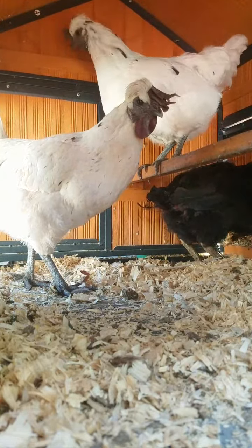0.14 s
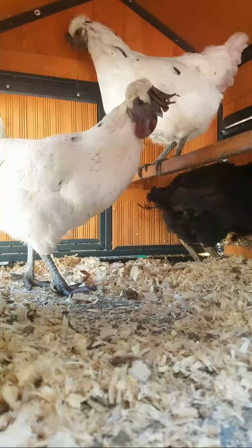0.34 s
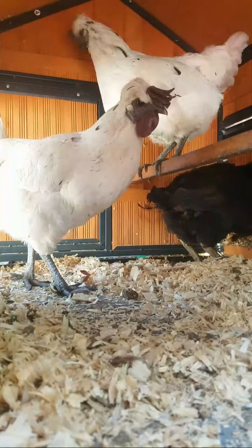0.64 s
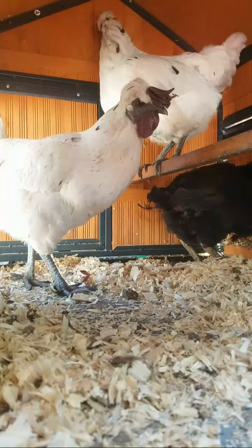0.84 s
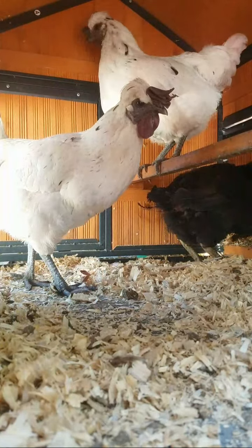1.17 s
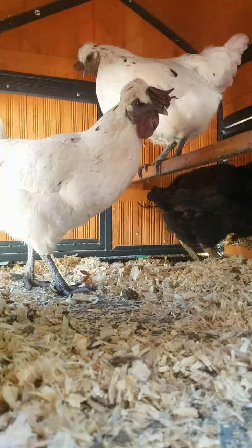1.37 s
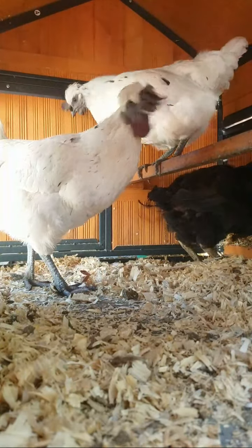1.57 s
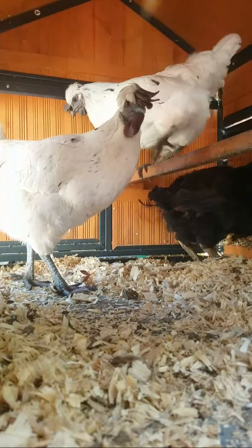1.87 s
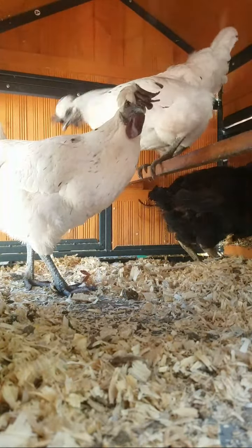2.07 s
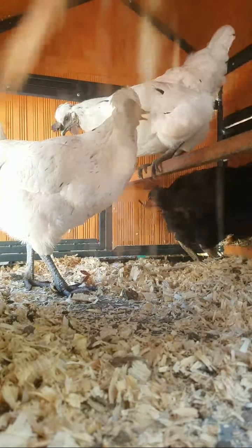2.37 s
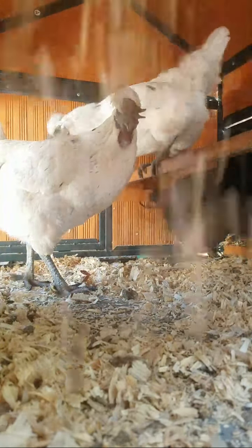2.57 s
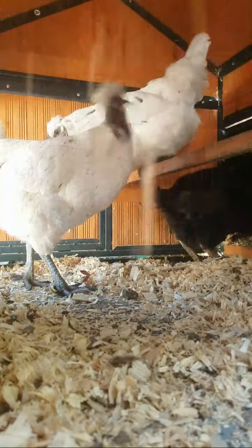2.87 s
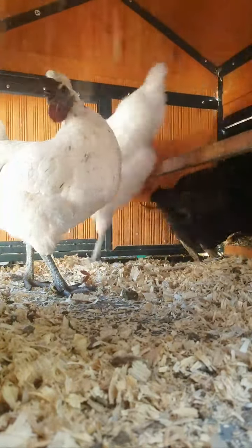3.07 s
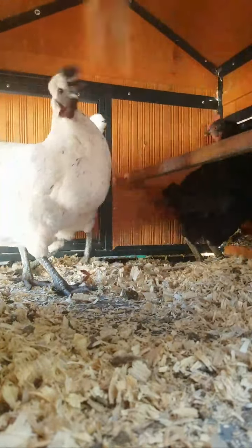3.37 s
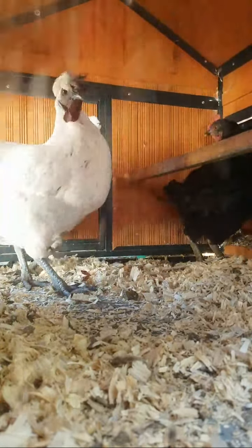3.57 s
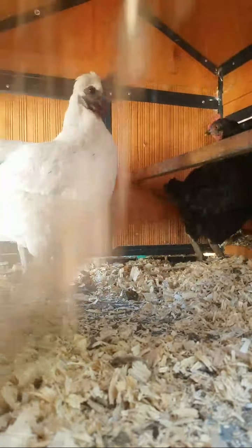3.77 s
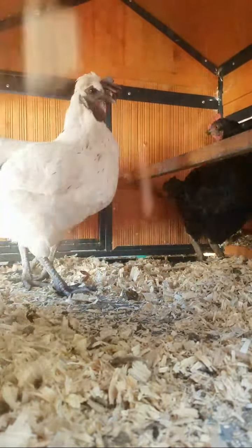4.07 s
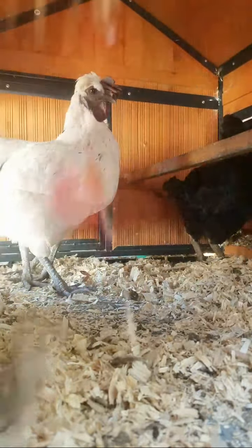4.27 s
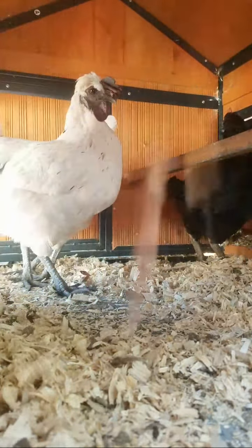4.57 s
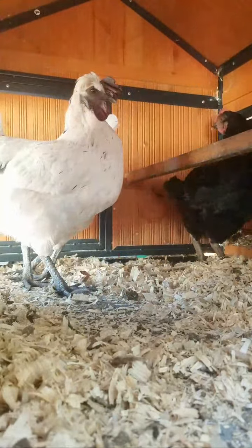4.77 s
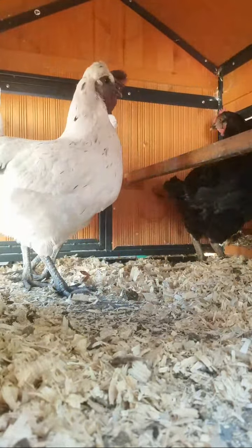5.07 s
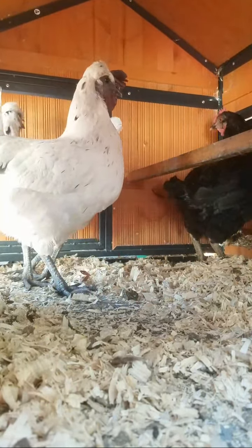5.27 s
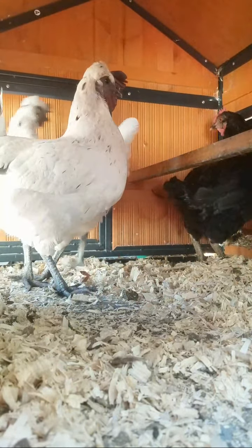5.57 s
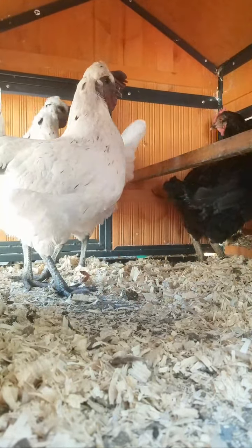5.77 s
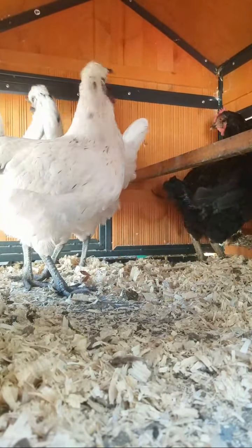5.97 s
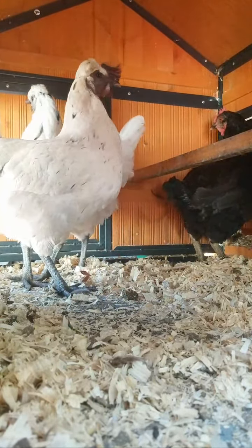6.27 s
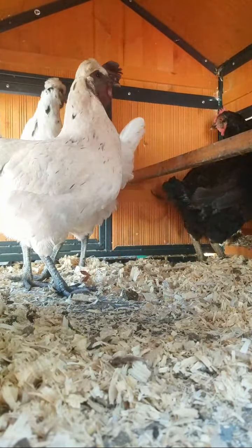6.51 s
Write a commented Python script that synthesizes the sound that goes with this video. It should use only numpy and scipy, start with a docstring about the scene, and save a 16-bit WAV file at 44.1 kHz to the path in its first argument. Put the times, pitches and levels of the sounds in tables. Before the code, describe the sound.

Quiet low drone and outdoor air first, then a quick soft cluck. Papery wood flakes begin flying, with irregular swishes, bright ticks, tiny squeaks and loud hard blows right on the microphone, which sits in the litter of a close wooden coop. After the scratching stops, a faint thin whistle sags, a small wooden knock sounds, and the far engine becomes rougher.

```python
"""A far engine's hum and outdoor rumble come first, heard by a phone lying in a hen house's wood shavings.
Then a hen clucks softly (harmonics through a throat) and litter is scratched up: thick noise grains rustle
and patter, filtered impulses strike the phone, noise bursts snap on its case and narrow bands squeak.
Late on, a foot knocks on a board (decaying modes), a thin whistle sags and the engine's roar grows."""
import sys
import numpy as np
from scipy import signal
from scipy.fft import rfft, irfft, next_fast_len
from scipy.io import wavfile
from scipy.ndimage import uniform_filter1d

SR = 44100
rng = np.random.default_rng(int(sys.argv[2]) if len(sys.argv) > 2 else 0)


def persist_wave(psi):
    """Save psi, clipped to +-1, as 16-bit WAV."""
    counts = np.round(np.clip(psi, -1, 1) * 32767).astype(np.int16)
    wavfile.write(sys.argv[1], SR, np.atleast_2d(counts).T)


N = 292824
T = np.arange(N) / SR

# sweeps of a foot or wing through the litter:
# (middle [s], half length [s], body level [dB], crackle relative to body [dB])
SWEEPS = [(1.56, 0.0082, -54, -1.5), (2.072, .008, -50.5, 9), (2.265, 0.0041, -33, -4),
          (2.458, 0.0089, -44, -2), (2.522, 0.022, -41, -5), (2.593, .012, -35, -2), (2.692, 0.016, -36, 3),
          (2.779, 0.019, -41.5, -5), (3.065, .012, -41.5, -2), (3.156, 0.026, -37, -8),
          (3.332, .013, -35, -8), (3.41, 0.039, -45.5, -5), (3.729, 0.029, -43.5, 2.5),
          (3.923, .011, -33, -2), (4.088, 0.00071, -33, -12), (4.184, 0.028, -35, -8.5),
          (4.36, 0.059, -49, -12), (4.499, 0.015, -53, 8.5), (4.689, 0.0057, -51.5, 5),
          (5.093, 0.032, -55.5, -1), (5.495, 0.0097, -42, -16), (5.654, 0.02, -41, -9)]
# spectrum of the papery body of big flakes: (frequency [Hz], relative level [dB])
FLAKE_BODY = [(100, -12), (300, 2.5), (900, -6.5), (1700, -7), (2700, -10), (3700, -14), (5300, -15),
              (7200, -25), (9000, -37.5)]
# spectrum of the crackle of dry edges: (frequency [Hz], relative level [dB])
EDGE_CRACKLE = [(2000, -21), (5000, -8), (7500, -7), (8600, -1), (10000, 0), (16000, -3)]


def undb(db):
    """Decibels to amplitude gain."""
    return 10 ** (np.asarray(db) / 20)


def unit(x):
    """Scale to rms 1."""
    return x / np.sqrt(np.mean(x ** 2))


def curves(rows):
    """Each column of a table after the time, joined by straight lines."""
    s, *columns = np.transpose(rows)
    return [np.interp(T, s, column) for column in columns]


def colour(x, points):
    """Filter by a (Hz, dB) spectrum with minimum phase, so nothing sounds early, as in a passive body."""
    size = next_fast_len(len(x) + 1024) * 2
    hz, db = np.transpose(points)
    f = np.maximum(np.fft.rfftfreq(size, 1 / SR), 1)
    gain = undb(np.interp(np.log(f), np.log(hz), db))
    # folding the cepstrum forward in time gives the minimum phase
    cepstrum = irfft(np.log(gain))
    cepstrum[1:size // 2] *= 2
    cepstrum[size // 2 + 1:] = 0
    response = np.exp(rfft(cepstrum))
    return irfft(rfft(x, size) * response)[:len(x)]


def band(x, hz, octaves):
    """Band-pass around a centre, with its edges kept below the top of the spectrum."""
    edges = hz * 2 ** (np.array([-.5, .5]) * octaves)
    edges = np.minimum(edges, [.4 * SR, .45 * SR])
    return signal.sosfilt(signal.butter(2, edges, "band", fs=SR, output="sos"), x)


def walk(rate):
    """Smooth random drift of rms 1, drawing `rate` new values a second."""
    k = int(SR / rate)
    held = np.repeat(rng.standard_normal(N // k + 1), k)
    smooth = uniform_filter1d(uniform_filter1d(held, k), k)
    return unit(smooth[:N])


def fade(t, t60):
    """Exponential decay that falls 60 dB in t60 seconds."""
    return undb(-60 * t / t60)


def swell(middle, half):
    """Bell-shaped rise and fall of a rubbing gesture."""
    return np.exp(-.5 * ((T - middle) / half) ** 2)


def add(out, s, x):
    """Mix a sound in at a time in seconds."""
    i = int(s * SR)
    out[i:i + len(x)] += x[:N - i]


def grains(rate, spread_db, smear_t60):
    """Countless tiny contacts of uneven size (`rate` a second), each with a short scratchy tail."""
    size = undb(spread_db * np.minimum(rng.exponential(size=N), 4.5)) * rng.choice([-1, 1], N)
    clicks = size * (rng.random(N) < rate / SR)
    smear = fade(T[:400], smear_t60)
    energy = np.abs(signal.fftconvolve(clicks ** 2, smear ** 2)[:N])
    tail = 0.21 * rng.standard_normal(N) * np.sqrt(energy)
    return unit(clicks + tail)


def echoes(t, t60):
    """Dense reflections from the close wooden walls: coloured, decaying noise with unit energy."""
    # ring of the wooden box: (frequency [Hz], relative level [dB])
    box_ring = [(90, 4.5), (200, -6.5), (380, -1.5), (520, 0.5), (1000, -4), (1800, 1.5), (8000, -10.5)]
    onset = 1 - np.exp(-t / 0.00048)
    tail = colour(rng.standard_normal(len(t)), box_ring) * fade(t, t60) * onset
    return tail / np.linalg.norm(tail)


def engine_note(rows, gain_db, waver_db, third_db):
    """A low note that throbs against a weaker neighbour and wavers on its way through the air."""
    hz, db = curves(rows)
    phase = 2 * np.pi * np.cumsum(hz * (1 + 0.009 * walk(20))) / SR
    neighbour = undb(-9) * np.sin(phase * 11 / 12 + .6 * walk(12))
    third_harmonic = undb(third_db) * np.sin(3 * phase + walk(25))
    tone = np.sin(phase) + neighbour + third_harmonic
    return np.sqrt(2) * undb(db + gain_db + waver_db * walk(22)) * tone


def engine_hum():
    """The far engine's two notes, each with its own slow glide and level."""
    # upper note: (time [s], pitch [Hz], level before the gain below [dB])
    upper_note = [(0, 113.3, -43.5), (.6, 117, -42), (1.2, 119, -38), (1.7, 121.9, -38.5),
                  (2.3, 121.3, -49.5), (3, 119.6, -45.5), (3.6, 115.8, -54.5), (5.1, 115.4, -54.5),
                  (6.64, 110.8, -55)]
    # lower note: (time [s], pitch [Hz], level before the gain below [dB])
    lower_note = [(0, 76.15, -58.5), (2.6, 71, -49), (4.9, 71.6, -51), (5.1, 73.05, -39.5),
                  (5.8, 75.03, -41.5), (6.64, 79, -42.5)]
    upper = engine_note(upper_note, gain_db=-2, waver_db=1, third_db=-35.5)
    lower = engine_note(lower_note, gain_db=-4.0, waver_db=4.0, third_db=-15)
    return upper + lower


def yard_air():
    """Outdoor rumble and hiss: coloured noise with a slow drift in level."""
    # spectrum of the outdoor air: (frequency [Hz], relative level [dB])
    air_spectrum = [(15, -38), (25, -32.5), (64, -11.5), (92, -4.5), (114, -9), (137, -9), (161, -12),
                    (206, -9.5), (270, -20), (516, -26), (677, -26.5), (1650, -29), (3300, -45),
                    (5500, -49.5), (7600, -57.5), (12500, -48), (16000, -53)]
    # its loudness: (time [s], level [dB])
    air_level = [(0, -48.5), (4.8, -47), (5.6, -46), (6.64, -46.5)]
    air = unit(colour(rng.standard_normal(N), air_spectrum))
    return air * undb(curves(air_level)[0] + 0.38 * walk(4.03))


def engine_roar(hz=430, octaves=0.89):
    """Coarse band of noise that grows as the engine labours."""
    # (time [s], level [dB])
    roar_level = [(4.5, -72), (5.9, -60), (6.64, -55.5)]
    return unit(band(rng.standard_normal(N), hz, octaves)) * undb(curves(roar_level)[0])


def whistle(gain_db=-2, drift_rate=220):
    """A thin airy tone that sags as it ends: random drift on two quadrature waves blurs its pitch."""
    # (time [s], pitch [Hz], level before the gain and flicker [dB])
    whistle_path = [(4.45, 3200, -90), (4.6, 3200, -65), (4.8, 3150, -72), (5.1, 3170, -67),
                    (5.24, 2950, -64), (5.3, 2900, -90)]
    hz, db = curves(whistle_path)
    phase = 2 * np.pi * np.cumsum(hz) / SR
    tone = walk(drift_rate) * np.sin(phase) + walk(drift_rate) * np.cos(phase)
    return tone * undb(db + gain_db + 2 * walk(30))


def shower():
    """Body and crackle level of falling shavings in dB: the trickle's power plus what each sweep throws up."""
    # trickle under the sweeps, swelling and thinning: (time [s], body level [dB], crackle level [dB])
    trickle_flow = [(1.2, -68, -85), (1.45, -65.5, -68.5), (1.95, -60.5, -71), (2.17, -59, -59.5),
                    (2.35, -51, -48), (2.8, -43, -51), (2.93, -51, -49.5), (3.6, -51, -53.5),
                    (4.4, -53, -54.5), (4.8, -58.5, -68.5), (5.85, -55, -65.5), (6.15, -64.5, -77)]
    # a sweep of this half length throws up flakes that patter down; longer ones throw more
    sweep_s, settle_db, settle_t60_s = 0.012, -10, .6
    body, crackle = (undb(column) ** 2 for column in curves(trickle_flow))
    for s, half, db, crisp_db in SWEEPS:
        patter = undb(db + settle_db) * fade(T[:SR], settle_t60_s)
        settling = half / sweep_s * patter ** 2
        add(body, s, settling)
        add(crackle, s, settling * undb(crisp_db) ** 2)
    return 10 * np.log10(body), 10 * np.log10(crackle)


def litter(flow, body_db=-1, flutter_db=3.0, own_db=1.5):
    """Shavings patter down in clumps: big flakes give a papery body, their edges a fine crackle."""
    body, crackle = (undb(level + own_db * walk(70)) for level in flow)
    # single flakes stand out only while litter is flying; otherwise they blur into noise
    near = np.interp(T, [1.3, 1.42, 4.5, 4.8], [0, 1, 1, 0])
    blur = np.sqrt(1 - near ** 2) * rng.standard_normal(N)
    flake_grains = near * grains(rate=600, spread_db=4.0, smear_t60=0.014) + blur
    edge_grains = near * grains(rate=510, spread_db=1.0, smear_t60=0.016) + blur
    flakes = unit(colour(flake_grains, FLAKE_BODY))
    edges = unit(colour(edge_grains, EDGE_CRACKLE))
    clumps = undb(flutter_db * near * walk(80))
    return clumps * (undb(body_db) * body * flakes + crackle * edges)


def hen(settle=4.52, jitter=0.012, rasp=0.29, room_db=-16, room_t60=0.16):
    """Short clucks whose pitch drops and settles: five harmonics, lifted most near 600 Hz by the throat."""
    # (start [s], length [s], first pitch [Hz], pitch it settles to [Hz], level before swell and rasp [dB])
    cluck_rows = [(1.398, 0.025, 437, 341, -54), (1.442, 0.044, 367, 249, -51.5),
                  (1.564, .03, 305, 264, -52), (1.614, 0.072, 440, 288, -56.5),
                  (1.709, 0.048, 436, 381, -34.5)]
    # gain of the throat: (frequency [Hz], gain [dB])
    throat_gain = [(250, 3), (390, -4.5), (600, 11), (780, 2.5), (1150, -8), (1530, -15.5), (1900, -28)]
    out, waver, flutter = np.zeros(N), walk(350), walk(900)
    throat_hz, throat_db = np.transpose(throat_gain)
    for s, length, first_hz, last_hz, db in cluck_rows:
        u = np.linspace(0, 1, int(length * SR))
        glide = last_hz + (first_hz - last_hz) * np.exp(-settle * u)
        hz = glide * (1 + jitter * waver[int(s * SR):][:len(u)])
        phase = 2 * np.pi * np.cumsum(hz) / SR
        voice = sum(undb(np.interp(k * hz, throat_hz, throat_db)) * np.sin(k * phase) for k in range(1, 6))
        add(out, s, undb(db) * unit(voice) * np.sin(np.pi * u))
    out *= 1 + rasp * flutter  # uneven cycles roughen the voice
    room = signal.fftconvolve(out, echoes(T[:SR // 5], room_t60))[:N]
    return out + undb(room_db) * room


def strays(flow_db, over_db, spread_db, count):
    """Lone pieces land at random, harder when the shower is thick: rows of (s, peak dB, size 0-1)."""
    # litter is in the air between these times: (start [s], end [s])
    flying_span = (1.4, 4.7)
    start, end = flying_span
    when, force, size = rng.random((count, 3)).T
    s = start + (end - start) * (np.arange(count) + when) / count
    peak_db = np.interp(s, T, flow_db) + over_db + spread_db * (force - .5)
    return np.transpose([s, peak_db, size])


def strikes(flow_db, ring_t60_1khz=0.033, stray_ring_db=-10, small_hz=3000, large_hz=400, stray_octaves=2.32):
    """Each blow is a band-passed impulse: soft clods low, hard flakes high; the box rings after it."""
    # hardest flakes and clods that strike the phone, with the low thump of a wing flap at 3.152 s: (peak time
    # [s], direct peak [dB], centre [Hz], width [octaves], ring relative to direct blow [dB])
    hard_strikes = [(1.958, -36.5, 5500, 1.3, -1), (2.0662, -24.5, 403, 2.86, -8),
                    (2.2663, -22.5, 350, 2.56, -16), (2.3788, -23, 1710, 1.7, -9),
                    (2.4382, -23, 1870, 1.24, -0.5), (2.5820, -3, 2270, 1.4, -3),
                    (2.5825, -5.5, 784, 2.9, -6), (2.6739, -17.5, 1180, 2.4, -18),
                    (2.6797, -16, 413, 1.36, -19), (2.7004, -19, 262, 2.5, -2),
                    (2.7063, -12.5, 320, 2.47, -19), (2.75, -13, 2200, 2.2, 0.5),
                    (2.9670, -24.5, 1980, 2.2, -2.5), (3.152, -30.5, 108, 0.77, 3),
                    (3.244, -30, 496, 1.5, -15), (3.3186, -9, 1640, 0.85, -2), (3.3205, -16, 170, 1.7, 1.5),
                    (3.3257, -15, 1000, 3.16, 7), (3.562, -34, 760, 1.1, 6.5), (3.5975, -8, 2170, 6.9, -5),
                    (3.9132, -21.5, 530, 2.06, 1), (3.9477, -22.5, 380, 2.6, -10),
                    (4.124, -27.5, 1450, 3.1, 0), (4.156, -19.5, 600, 5.2, -3),
                    (4.1900, -22.5, 1130, 2.5, 3.5), (4.2342, -24.5, 734, 2, -15),
                    (4.3462, -20, 920, 1.6, -7), (4.3911, -19.5, 2550, 2.5, 2.5),
                    (4.3934, -3.5, 225, 2.34, -14), (4.693, -36, 298, 1.8, -5)]
    # the phone's case colours every blow: (frequency [Hz], gain before peak scaling [dB])
    case_gain = [(50, -37), (105, 5), (320, 6.5), (410, -0.5), (530, 3), (1000, -2), (1400, -1), (2200, -4),
                 (3600, -6.5), (4200, -4.5), (5500, -0.5), (7200, -16), (16000, -4)]
    out, t = np.zeros(N), T[:SR // 6]
    contact = colour(signal.unit_impulse(len(t)), case_gain)
    light_strikes = [(s, db, small_hz * (large_hz / small_hz) ** size, stray_octaves, stray_ring_db)
                     for s, db, size in strays(flow_db, over_db=16.5, spread_db=4.5, count=54)]
    for s, db, hz, octaves, ring_db in [*hard_strikes, *light_strikes]:
        blow = band(contact, hz, octaves)
        ring_t60 = ring_t60_1khz * (1000 / hz) ** 0.81  # low blows ring longer
        ring = signal.fftconvolve(blow, echoes(t, ring_t60))[:len(t)]
        ring *= undb(ring_db) * np.linalg.norm(blow) / np.linalg.norm(ring)
        peak = np.abs(blow)
        add(out, s - np.argmax(peak) / SR, undb(db) * (blow + ring) / peak.max())
    return out


def ticks(flow_db, rise=0.00022, snap_t60=0.0022, tail_t60=0.038, tail_db=-20):
    """A splinter gives a bright snap, each at its own pitch, a weaker knock on the phone's case and a brief
    fizz."""
    # loudest dry splinters that snap on the case: (time [s], peak [dB])
    loud_splinters = [(1.6651, -34.5), (1.6986, -26), (1.732, -23), (2.0042, -25.5), (2.0637, -18),
                      (2.2358, -17), (2.3306, -19), (2.6884, -23), (3.24, -23), (3.5952, -22),
                      (4.2223, -20), (4.3885, -22.5), (4.435, -22.5), (4.7645, -23.5)]
    splinter_hz, splinter_octaves, case_hz, case_db = 11000, 0.98, 3500, -13
    out, t = np.zeros(N), T[:SR // 20]
    shape = (1 - np.exp(-t / rise)) * (fade(t, snap_t60) + undb(tail_db) * fade(t, tail_t60))
    light_splinters = strays(flow_db, over_db=20.5, spread_db=4.5, count=32)[:, :2]
    for s, db in [*loud_splinters, *light_splinters]:
        burst = rng.standard_normal(len(t)) * shape
        own_hz = splinter_hz * np.exp(0.2 * rng.standard_normal())
        snap = band(burst, own_hz, splinter_octaves) + undb(case_db) * band(burst, case_hz, 1)
        add(out, s - rise, undb(db) * snap / np.abs(snap).max())
    return out


def scuffs():
    """A dense swell of litter grains as a foot or wing sweeps through."""
    body = unit(colour(grains(rate=2400, spread_db=5.0, smear_t60=0.011), FLAKE_BODY))
    edges = unit(colour(grains(rate=2400, spread_db=6.5, smear_t60=0.027), EDGE_CRACKLE))
    return sum(undb(db) * swell(s, half) * (body + undb(crisp_db) * edges)
               for s, half, db, crisp_db in SWEEPS)


def squeaks(hz=3100, octaves=0.26):
    """Straws squeak as they rub: quick slips ring a narrow resonance."""
    # (middle [s], half length [s], level [dB])
    squeak_rows = [(1.762, .005, -56), (2.447, 0.0063, -53), (2.525, 0.008, -48), (3.059, 0.01, -45),
                   (3.197, 0.0064, -41), (5.188, 0.0076, -59)]
    slips = unit(band(grains(rate=3800, spread_db=2, smear_t60=0.008), hz, octaves))
    return slips * sum(undb(db) * swell(s, half) for s, half, db in squeak_rows)


def step(time_s=5.2708, peak_db=-24.5, scrape_t60=0.062, scrape=0.21):
    """A foot lands on a board: a sharp hit and a fading scrape excite its decaying modes."""
    # modes of the board: (frequency [Hz], relative level [dB], t60 [s])
    board_modes = [(228, 2, .05), (430, 4.5, 0.045), (540, 3.5, 0.094), (636, 6.5, 0.042), (806, -3, 0.041),
                   (1005, -6, 0.072), (1105, -8, 0.12), (1210, -8, 0.069), (1500, -12, 0.053)]
    out, t = np.zeros(N), T[:SR // 5]
    modes = sum((-1) ** k * undb(db) * np.sin(2 * np.pi * hz * t) * fade(t, t60)
                for k, (hz, db, t60) in enumerate(board_modes))
    rub = rng.standard_normal(len(t)) * fade(t, scrape_t60) / np.sqrt(20)
    foot = signal.unit_impulse(len(t)) + scrape * rub
    knock = signal.fftconvolve(modes, foot)[:len(t)]
    add(out, time_s, undb(peak_db) * knock / np.abs(knock).max())
    return out


def scene():
    """Everything in the coop, on one microphone."""
    far = engine_hum() + yard_air() + engine_roar() + whistle()
    body_db, crackle_db = shower()
    shavings = litter((body_db, crackle_db)) + strikes(body_db) + ticks(crackle_db) + scuffs() + squeaks()
    return (far + shavings + hen() + step())[None]


def record(dry):
    """The phone sheds the deep bass below 40 Hz and cuts the top above 16 kHz."""
    thin = signal.sosfilt(signal.butter(2, 40, "high", fs=SR, output="sos"), dry)
    return signal.sosfilt(signal.ellip(10, .2, 70, 16000, fs=SR, output="sos"), thin)


dry = scene()
out = record(dry)
persist_wave(out)
```